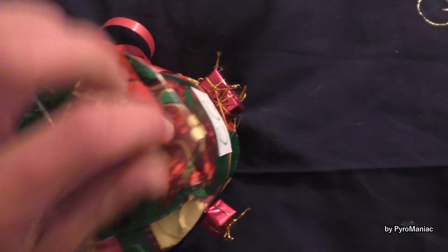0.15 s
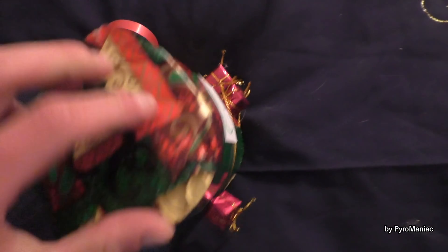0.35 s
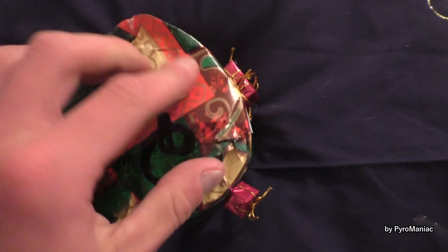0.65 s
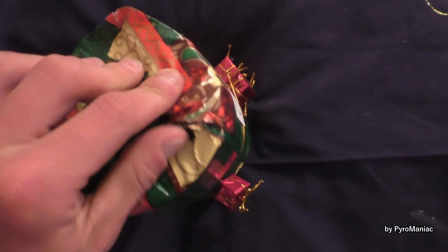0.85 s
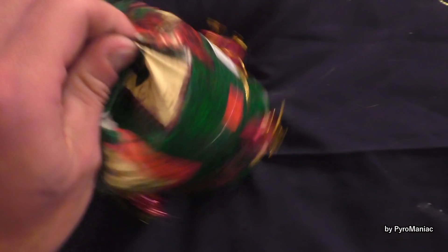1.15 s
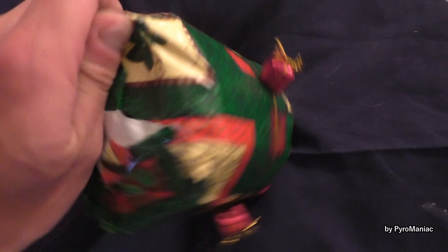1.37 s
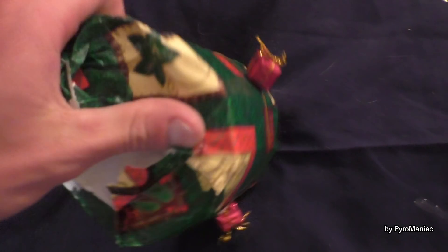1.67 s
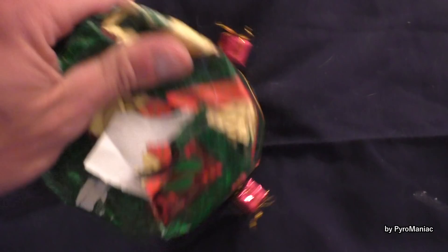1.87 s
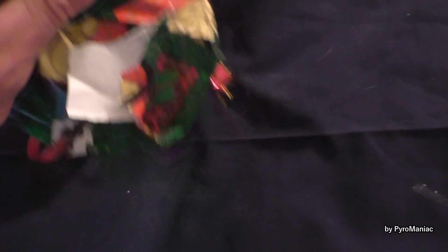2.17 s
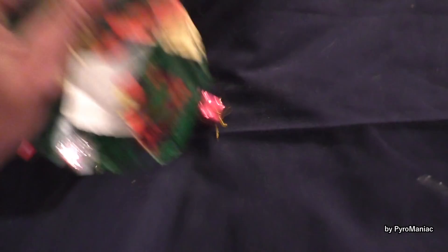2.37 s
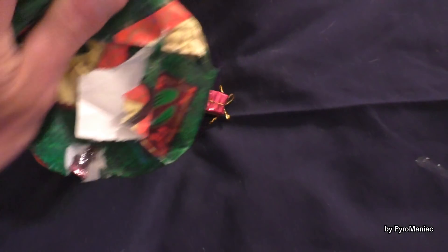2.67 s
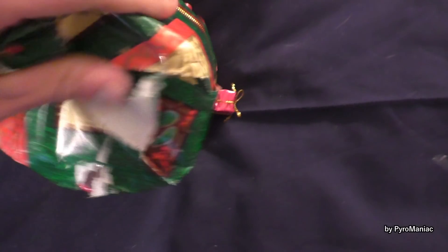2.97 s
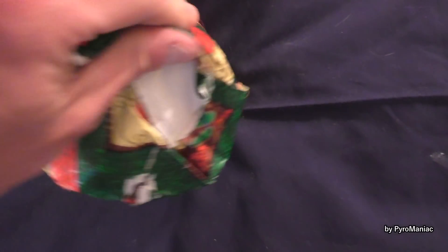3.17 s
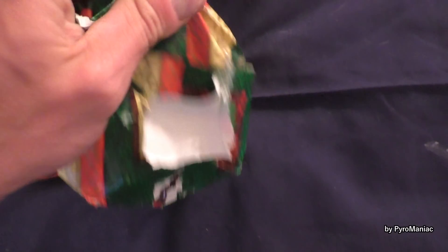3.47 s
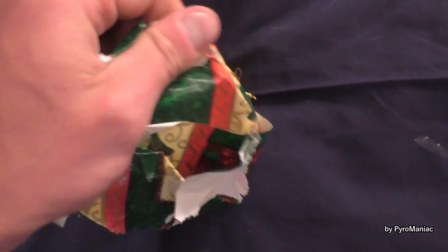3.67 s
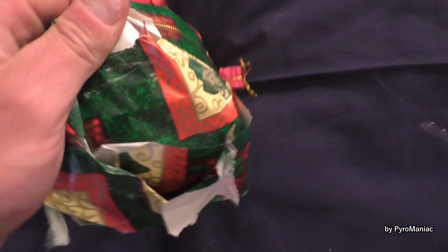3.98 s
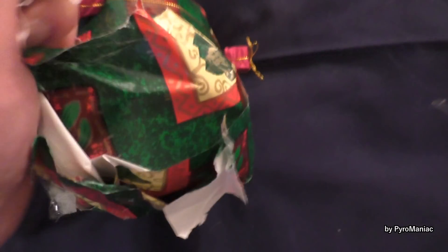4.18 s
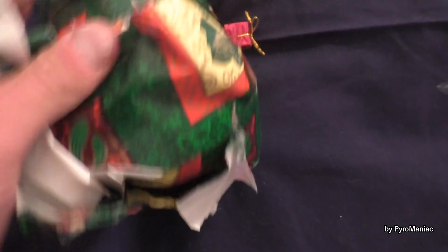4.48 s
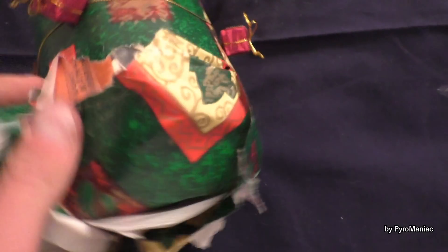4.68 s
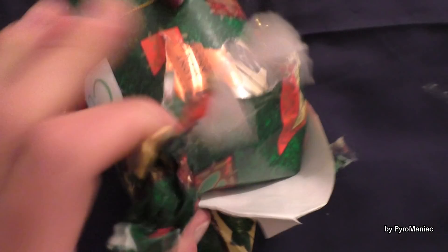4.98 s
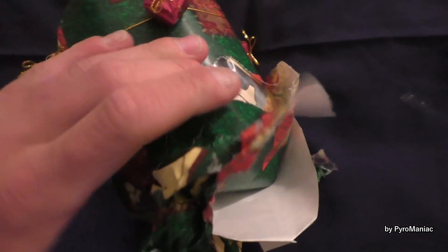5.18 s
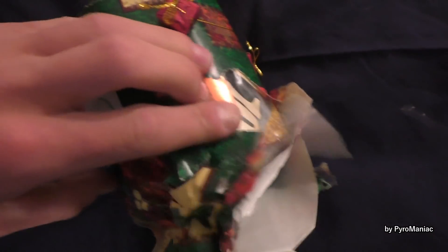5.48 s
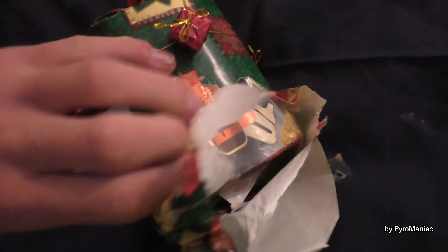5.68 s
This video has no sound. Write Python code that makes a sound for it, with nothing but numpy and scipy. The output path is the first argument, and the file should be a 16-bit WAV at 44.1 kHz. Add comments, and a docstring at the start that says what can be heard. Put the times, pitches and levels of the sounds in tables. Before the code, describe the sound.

Continuous crinkling of wrapping paper: separate bright snaps, clustered tiny ticks and fibrous hiss, with many short tears. Activity comes in bursts, easing around two seconds and again near 4.6, strongest near three to four and at the end. The hollow parcel knocks faintly and rubs low on fabric. Close stereo pickup indoors, little echo, slight shifts between left and right.

```python
"""Hands tear and crumple glossy wrapping paper on a cloth-covered table, close to a small stereo microphone.
Creases buckle as sharp snaps: short noise bursts that ring the nearest paper panel.
Tearing fibres and sliding fingers add clumped ticks and hiss, with quick tears cut from the same noise.
The hollow parcel knocks in a few low cycles and rumbles softly on the cloth as filtered noise.
The damped room answers the paper with sparse, fading reflections."""
import sys
import numpy as np
from scipy import signal
from scipy.fft import rfft, irfft
from scipy.io import wavfile
from scipy.ndimage import uniform_filter1d

SR = 44100
rng = np.random.default_rng(int(sys.argv[2]) if len(sys.argv) > 2 else 0)


def master_out(mix):
    """Clip the mix to full scale and print it as 16-bit PCM to the path in sys.argv[1]."""
    frames = np.transpose(np.atleast_2d(mix))
    ceiling = np.clip(frames, -1, 1)
    pcm = np.round(ceiling * 32767).astype(np.int16)
    wavfile.write(sys.argv[1], SR, pcm)


N = 257544  # length in samples
SPLIT_HZ, EDGE_HZ = 5000, 15750  # where the treble begins, where the microphone's band ends
USUAL_DB = -38.5  # ordinary crackle level; brightness and rumble shift around it


def gain_of(db):
    """Turns decibels into a plain multiplier."""
    return 10 ** (np.asarray(db) / 20)


def evened(x):
    """Scales each row to an average (RMS) strength of 1."""
    return x / np.sqrt(np.mean(x ** 2, -1, keepdims=True) + 1e-20)


def peaked(x):
    """Scales each row so that its highest peak is 1."""
    return x / (abs(x).max(-1, keepdims=True) + 1e-20)


def read(points, hz):
    """Reads a table over pitch, with straight lines on a logarithmic pitch scale."""
    f, value = np.transpose(points)
    return np.interp(np.log(hz + 1), np.log(f + 1), value)


def over_time(points):
    """Reads a table over time, with straight lines, at every sample."""
    return np.interp(np.arange(N) / SR, *np.transpose(points))


def panned(pan_db):
    """Left and right gains for a sound that is pan_db louder on the left."""
    return gain_of([[pan_db / 2], [-pan_db / 2]])


def treble(x):
    """The part above SPLIT_HZ, without delay, so that x - treble(x) is the part below."""
    taps = signal.firwin(45, SPLIT_HZ, pass_zero=False, fs=SR)
    return signal.oaconvolve(x, taps[None], "same", axes=1)


def place(times, sounds, pan_db):
    """Adds each sound so that its peak falls on its time."""
    size = sounds.shape[1]
    out = np.zeros((2, N + 2 * size))  # spare room at both ends
    for s, sound, pan in zip(times, sounds, pan_db):
        start = round(s * SR) + size - abs(sound).argmax()
        out[:, start:start + size] += panned(pan) * sound
    return out[:, size:size + N]


def patchy(x, db, frames, bins, size):
    """Lets the colour drift in random patches over time and frequency, as different folds take over."""
    z = signal.stft(x, SR, nperseg=size)[2]
    field = uniform_filter1d(rng.standard_normal(z.shape[1:]), bins, 0)
    field = uniform_filter1d(field, frames, 1)
    return signal.istft(z * gain_of(db * field / field.std()), SR, nperseg=size)[1][:, :N]


def room(x, size=9000):
    """Sparse reflections of random sign, other ones for each side; bass and treble die at their own speeds."""
    taps = np.zeros((2, size))
    # one reflection at a random place in every 22 samples
    at = np.arange(150, size - 22, 22) + rng.integers(0, 22, (2, (size - 151) // 22))
    np.put_along_axis(taps, at, rng.choice([-1., 1.], at.shape), 1)
    t, top = np.arange(size) / SR, treble(taps)
    low_fade, top_fade = gain_of(-60 * t / 0.21), gain_of(-60 * t / 0.2)  # seconds to fall by 60 dB
    tail = (taps - top) * low_fade + top * top_fade
    return signal.oaconvolve(x, tail / np.linalg.norm(tail[0]), axes=1)[:, :N]


# how strong the rumble is at each pitch, relative: (f/Hz, level/dB per Hz)
RUMBLE_COLOUR = [(12, -42), (20, -15), (81, -3.5), (256, -1.5), (440, -0.5), (567, -12), (792, -14.5),
                 (900, -10), (1170, -15), (1980, -120)]
# how alike the rumble is on the left and right: (f/Hz, likeness 0-1)
RUMBLE_LIKENESS = [(30, 0.1), (130, 0.46), (290, 0.54), (640, 0.98), (1400, 0.25)]
# rubbing on the cloth while the paper is at its usual loudness: (t/s, level/dB)
RUBBING_LEVEL = [(0, -53), (1.1, -56.5), (1.45, -54), (2.05, -59), (3.06, -51.5), (3.7, -58.5),
                 (4.419, -54), (4.6, -57), (5.0, -48), (5.2, -52.5), (5.35, -45.5), (5.84, -54)]
RUB_PER_DB = 0.0436  # dB of extra rumble for each dB of louder paper


def rumble(paper):
    """The parcel and hands rub the cloth: lumpy low noise, less alike left and right in the bass."""
    hz = np.fft.rfftfreq(N, 1 / SR)
    a, b = rfft(rng.standard_normal((2, N)))
    same = np.clip(read(RUMBLE_LIKENESS, hz), 0, 1)
    right = same * a + np.sqrt(1 - same ** 2) * b
    both = irfft(gain_of(read(RUMBLE_COLOUR, hz)) * np.array([a, right]), N)
    lumpy = evened(patchy(both, db=3, frames=3, bins=7, size=1024))
    power = uniform_filter1d(uniform_filter1d(paper[0] ** 2, 900), 900)
    paper_db = 10 * np.log10(abs(power) + 1e-9)
    pressure_db = over_time(RUBBING_LEVEL) + RUB_PER_DB * (paper_db - USUAL_DB)
    return panned(3) * gain_of(pressure_db) * lumpy


# how far the sideways difference lies under the middle sound: (f/Hz, level/dB)
SIDE_UNDER_MIDDLE = [(300, -18), (700, -11), (1500, -30.5), (3000, -19.5), (5000, -12.5), (9000, -21.5),
                     (14000, -7)]


def capsules(x):
    """Scattering off moving hands reaches the two capsules unequally by pitch, and keeps changing."""
    hz, t, z = signal.stft(x.mean(0), SR, nperseg=64)
    a, b = uniform_filter1d(rng.standard_normal((2, len(hz), len(t))), 120, axis=2)
    scatter = (a + 1j * b) / np.sqrt(np.mean(a ** 2 + b ** 2))
    amount = gain_of(read(SIDE_UNDER_MIDDLE, hz))[:, None]
    side = signal.istft(z * scatter * amount, SR, nperseg=64)[1][:N]
    return x + np.array([side, -side])


# knocks and pops of the hollow parcel: (start t/s, peak level/dB, f/Hz)
PARCEL_KNOCKS = [(.272, -40, 258), (0.637, -37, 270), (0.878, -32, 270), (1.371, -30, 650),
                 (1.419, -29, 444), (1.455, -27, 413), (1.957, -39, 305), (3.097, -46, 191),
                 (3.491, -48, 230), (3.8055, -25, 480), (3.8061, -16.5, 975), (4.36, -38, 182),
                 (4.427, -34, 433), (4.448, -27, 770), (4.943, -41, 200), (5.028, -35.5, 430),
                 (5.277, -41, 196), (5.358, -52, 264), (5.768, -41, 136)]


def thumps():
    """A soft push on the hollow parcel: two or three low cycles."""
    s, db, hz = np.transpose(PARCEL_KNOCKS)
    cycles = hz[:, None] * np.arange(1500) / SR
    sounds = peaked(cycles * np.exp(-cycles / 0.59) * np.sin(2 * np.pi * cycles))
    peak_at = s + np.argmax(abs(sounds), 1) / SR  # place() wants the peak, the table gives the start
    return place(peak_at, gain_of(db)[:, None] * sounds, 0.87 + 0 * s)


# paper, table reflection and microphone together: (f/Hz, level/dB)
PAPER_COLOUR = [(18, -11), (30, -47), (404, -0.5), (801, -7), (1220, 1.5), (2060, 4), (3140, 3.5),
                (4910, 1), (6050, 0.5), (7470, -7), (8740, -2), (11100, -2), (14400, -9.5), (16000, -5)]


def coloured(x, size=4096):
    """Filter that never sounds early: its phase follows from the Hilbert transform of the log gain."""
    log_gain = np.log(gain_of(read(PAPER_COLOUR, abs(np.fft.fftfreq(size, 1 / SR)))))
    taps = np.fft.ifft(np.exp(np.conj(signal.hilbert(log_gain)))).real[:size // 2]
    return signal.oaconvolve(x, taps[None], axes=1)[:, :x.shape[1]]


# how hard the hands work the paper, as loudness of the fine crackle: (t/s, level/dB)
HAND_WORK = [(0, -37), (.15, -52.5), (.28, -49.5), (.36, -48.5), (.6, -52), (.65, -42.5), (.78, -45.5),
             (1.25, -35.5), (1.34, -42), (1.63, -42), (1.72, -51), (1.78, -36), (1.98, -48), (2.03, -50.5),
             (2.15, -57.5), (2.31, -44), (2.56, -44), (2.64, -46), (2.8, -42.5), (2.9, -40), (3.06, -37),
             (3.42, -43), (3.55, -32.5), (3.74, -47.5), (3.81, -37), (3.96, -40), (4.0, -52), (4.06, -28),
             (4.15, -38.5), (4.31, -34), (4.47, -47), (4.62, -49.5), (4.8, -41.5), (4.86, -48), (5.15, -43),
             (5.23, -53), (5.35, -41.5), (5.58, -45.5), (5.84, -33)]


def hands():
    """The work of the hands in dB at every sample."""
    return over_time(HAND_WORK)


def buckles(hz, turns, crack_ms, size=800, lead=200):
    """Panel ring and crack of each crease: a burst of noise rises quickly, dies away and rings a damped panel."""
    t = (np.arange(size) - lead) / SR
    rise = .25 * np.exp(t / 0.00044) + 0.042 * np.exp(t / 0.0015)
    fall = np.exp(-t * 1000 / crack_ms) + 0.027 * np.exp(-t / 0.016)
    burst = rng.standard_normal((len(hz), size)) * np.where(t < 0, rise, fall)
    burst = signal.lfilter(*signal.butter(1, 600, "high", fs=SR), burst)  # small panels radiate little bass
    after = np.arange(size) / SR
    turns = turns * np.exp(.5 * rng.standard_normal((len(hz), 1)))  # taut panels ring on, crushed ones are dead
    ring = np.exp(-after * hz[:, None] / turns) * np.cos(2 * np.pi * hz[:, None] * after)
    top = treble(burst)
    rung = peaked(signal.fftconvolve(burst, ring, axes=1)[:, :size])
    rung = rung + 0.63 * peaked(burst - top)
    return peaked(coloured(rung - treble(rung))), peaked(coloured(top))


def small_ticks(clumps, count=40):
    """Many small creases: random picks from a set of buckling sounds, most frequent within the clumps."""
    ring, crack = buckles(np.geomspace(1100, 4800, count), turns=1.0, crack_ms=0.39)
    crack_db = -3 + 5.7 * rng.standard_normal((count, 1))  # some dull, some all crack
    grains = peaked(ring + gain_of(crack_db) * crack)
    happens = rng.random(N) < 1200 * clumps / SR  # about 1200 ticks a second
    size = gain_of(5.4 * np.minimum(rng.exponential(1, N), 3.5)) * happens
    which, pan_db = rng.integers(0, count, N), 0.93 * rng.standard_normal(count)
    ticks = np.zeros((2, N))
    for k in range(count):
        ticks += panned(pan_db[k]) * signal.oaconvolve(size * (which == k), grains[k])[:N]
    return evened(ticks)


def ticks_and_hiss():
    """Small creases, and the hiss of fibres that part too fast to tell apart, in the same clumps."""
    drift = uniform_filter1d(uniform_filter1d(rng.standard_normal(N), 200), 200)
    clumps = gain_of(3.7 * evened(drift))
    clumps /= clumps.mean()
    noise = coloured(rng.standard_normal((1, N)))
    hiss = evened(patchy(noise, db=3.5, frames=12, bins=8, size=256)) * clumps ** 0.57
    return small_ticks(clumps), hiss


# share of sliding hiss against separate ticks: (t/s, share 0-1)
HISS_SHARE = [(0, 0.28), (1.0, 0.36), (1.25, 0.65), (2.3, 0.08), (2.8, 0.09), (3.55, .5), (3.75, 0.33),
              (4.1, .5), (4.45, 0.28), (4.62, 0.7), (5.0, 0.52), (5.84, 0.62)]
USUAL_BRIGHT_DB, BRIGHTER_PER_DB = -2.5, 0.14  # treble against the rest; harder work is brighter


def crackle(ticks, hiss):
    """Fine crackle: ticks and hiss blended, as loud and as bright as the hands work."""
    smooth = np.clip(over_time(HISS_SHARE), 0, 1)
    paper = np.sqrt(1 - smooth) * ticks + np.sqrt(smooth) * hiss
    top = treble(paper)
    bright_db = USUAL_BRIGHT_DB + BRIGHTER_PER_DB * (hands() - USUAL_DB)
    return gain_of(hands()) * (evened(paper - top) + gain_of(bright_db) * evened(top))


# quick tears: (start t/s, length t/s, level/dB, flap f/Hz, brightness level/dB, place of the peak 0-1)
QUICK_TEARS = [(0.202, 0.019, -37, 1820, -9, 0.58), (.627, 0.036, -33, 2500, 0, 0.37),
               (0.93, 0.033, -32, 2000, 3, 0.43), (1.072, .045, -33.5, 2800, 4, 0.36),
               (1.171, 0.1, -31.5, 2950, 8.5, 0.58), (1.366, 0.072, -27, 2800, 4.5, 0),
               (1.439, 0.038, -35, 2000, 6.5, 0.48), (1.765, 0.053, -43, 3000, -1, 0.85),
               (1.825, 0.059, -34.5, 2600, -5, 0.56), (1.931, 0.07, -30, 2200, 3.5, 0.33),
               (2.524, 0.087, -41, 2110, 8.5, 0.49), (2.946, 0.073, -35, 1890, -10, 0.5),
               (3.087, 0.026, -25, 1800, 5, 0.69), (3.481, 0.083, -38, 2210, 10, 0.52),
               (3.935, 0.04, -28.5, 2600, 6.5, 0.46), (4.038, 0.077, -35.5, 1970, 10, 0.42),
               (4.262, 0.025, -39, 1890, 9.5, 0.45), (4.508, 0.041, -49, 1765, 8, .4),
               (4.764, .077, -42, 4460, 12, 0.55), (4.88, 0.14, -44.5, 3230, -11, 0.2),
               (5.002, 0.038, -29, 2380, -0.5, 0.55), (5.059, 0.13, -43, 3020, 0, 0.67),
               (5.274, 0.037, -39, 2200, -3.5, 0.36), (5.445, 0.064, -42, 3000, 5.5, 0.2),
               (5.707, 0.024, -39.5, 2500, 10.5, 0.7), (5.762, 0.048, -38, 3030, 6, .55)]


def rips(ticks, hiss):
    """Each quick tear swells and stops as the strip comes free; the loosened flap rings broadly at its pitch."""
    tear = evened(hiss + 0.87 * ticks)  # dense fibre hiss with separate ticks nearly as strong
    out = np.zeros((2, N))
    for s, length, db, hz, bright_db, peak in QUICK_TEARS:
        start, size = round(s * SR), round(length * SR)
        fibres = tear[:, start:start + size]
        top = treble(fibres)
        flap = signal.lfilter(*signal.iirpeak(hz, 2.2, SR), fibres)
        # bend time so that the middle of the sine arch falls on the peak
        bend = np.log(.5) / np.log(np.clip(peak, .02, .9))
        swell = np.sin(np.pi * (np.arange(size) / size) ** bend) ** 1.27
        sound = fibres - top + 0.37 * flap + gain_of(bright_db) * top
        out[:, start:start + size] += gain_of(db) * swell * sound
    return out


# the clearest creases: (peak t/s, panel ring level/dB, panel f/Hz, level/dB of the crack above 5 kHz)
CLEAR_CREASES = [(.006, -10.5, 2700, -19.5), (0.015, -34, 2500, -16.5), (0.035, -14.5, 2420, -13),
                 (.038, -13.5, 1640, -14.5), (0.0729, -19, 1790, -40), (0.0865, -15.5, 1670, -28),
                 (0.1606, -24.5, 1630, -19), (0.2208, -23, 1380, -50), (0.2459, -8.5, 1670, -8.5),
                 (0.2761, -14.5, 3400, -9), (0.2888, -19.5, 1740, -29), (0.2981, -13.5, 1610, -12),
                 (0.3167, -19, 1690, -13.5), (0.3773, -22, 1390, -49), (0.4198, -11.5, 3600, -20),
                 (.432, -15, 2150, -21), (0.4506, -22, 1660, -30), (0.4556, -16, 1320, -14),
                 (0.4709, -20, 2520, -10), (0.4975, -27, 2890, -45), (.5038, -21, 1700, -26),
                 (0.509, -20.5, 3150, -21), (.5365, -20, 2190, -11), (.539, -17.5, 1970, -10),
                 (.642, -17.5, 3040, -21), (.67, -15, 2000, -11.5), (0.6862, -18.5, 1640, -20),
                 (0.6937, -20, 1850, -19), (.7038, -12.5, 2320, -6.5), (.7175, -20, 2860, -35),
                 (.741, -10.5, 3380, -15), (.7552, -16.5, 3440, -6.5), (.7642, -18, 3540, -21),
                 (.8033, -19.5, 2330, -32), (0.8256, -15, 2230, -19.5), (0.8348, -17.5, 3320, -30),
                 (0.8505, -20, 3040, -15), (.8636, -29, 3470, -8), (0.8806, -8, 1420, -8),
                 (.888, -14, 4300, -7), (.9008, -11.5, 2270, -14), (0.9136, -21, 3320, -14),
                 (0.9247, -19, 5000, -2.5), (.976, -21, 3750, -14), (1.0069, -9, 1770, -18),
                 (1.0356, -14, 2630, -7.5), (1.0831, -14, 1940, -5.5), (1.1005, -11.5, 3030, -10),
                 (1.1087, -10, 2510, -9), (1.1217, -26, 4430, -10), (1.1362, -20, 2170, -14),
                 (1.1438, -15, 2150, -9), (1.189, -29, 2130, -22), (1.2016, -23, 2510, -8.5),
                 (1.2345, -14.5, 3000, -9), (1.3244, -14, 2670, -14), (1.369, -13.5, 1710, -3.5),
                 (1.384, -17, 2860, -15.5), (1.404, -23, 2800, -16), (1.4417, -11.5, 4270, -12.5),
                 (1.4461, -21, 2630, -12), (1.455, -25, 1250, -18), (1.4648, -13.5, 1410, -24),
                 (1.4762, -10.5, 4800, -15), (1.5345, -19, 1660, -24.5), (1.583, -18, 1060, -45),
                 (1.6545, -15.5, 2320, -41), (1.6689, -18.5, 2580, -10.5), (1.727, -23, 3030, -24),
                 (1.768, -11.5, 3500, -11.5), (1.7942, -20, 1390, -6.5), (1.8322, -23, 2930, -6),
                 (1.86, -10, 3100, -13), (1.8849, -8, 3200, -13), (1.9357, -17, 4500, -17),
                 (1.957, -10, 2240, -6), (2.0232, -25, 1240, -38), (2.0442, -31, 2280, -31),
                 (2.06, -28, 2310, -32), (2.089, -29, 2270, -31), (2.1754, -20.5, 2920, -38),
                 (2.184, -20, 2260, -19.5), (2.2255, -16.5, 3100, -4.5), (2.256, -27, 4070, -8.5),
                 (2.2812, -19, 1620, -20), (2.303, -23, 1760, -22), (2.316, -25, 4950, -19),
                 (2.332, -23, 1370, -14.5), (2.3563, -20.5, 3470, -15.5), (2.3773, -16, 1830, -21.5),
                 (2.3914, -21, 1980, -29), (2.4417, -38, 1980, -15), (2.4519, -19.5, 2030, -42),
                 (2.4713, -24, 2100, -18), (2.601, -36, 1230, -21), (2.609, -29, 2800, -22),
                 (2.6271, -22, 1270, -40), (2.6345, -35, 1550, -20), (2.668, -22.5, 1820, -17.5),
                 (2.7178, -19, 3540, -33), (2.751, -19, 3750, -13), (2.7655, -24.5, 1980, -18),
                 (2.827, -16.5, 4200, -13.5), (2.925, -15, 2050, -0.5), (2.9308, -18.5, 1620, -11),
                 (2.9867, -17.5, 1800, -26), (2.9909, -13.5, 2760, -10), (3.011, -19, 2540, -6.5),
                 (3.025, -7, 2360, -14), (3.0595, -12.5, 1590, -13), (3.0688, -17, 2240, -5),
                 (3.0913, -21, 3210, -11), (3.103, -13, 1290, -14), (3.1066, -9, 1880, -23),
                 (3.139, -44, 4690, -17), (3.164, -39, 1810, -14), (3.188, -11, 2130, -9.5),
                 (3.212, -19, 2070, -15), (3.2337, -15.5, 2600, -11), (3.2583, -12.5, 3400, -12),
                 (3.2921, -17, 4160, -8), (3.3127, -19, 5100, -8), (3.3198, -14, 4300, -14),
                 (3.3776, -20, 1600, -38), (3.3828, -11, 1840, -19), (3.4561, -15, 4130, -12),
                 (3.4816, -21, 1440, -11), (3.4994, -10.5, 1870, -12), (3.519, -18, 2150, -11),
                 (3.5389, -11.5, 2230, -15), (3.619, -18, 2190, -13), (3.634, -22, 5000, -17),
                 (3.6526, -17, 1470, -13.5), (3.702, -17, 4070, -20), (3.7244, -25, 2300, -20),
                 (3.7533, -36, 3340, -22), (3.7776, -39, 1420, -17), (3.7924, -22, 2300, -16),
                 (3.8016, -24, 3160, -22), (3.8065, -12.5, 1100, -8), (3.8174, -14, 1800, -4.5),
                 (3.839, -24, 3100, -23), (3.8663, -19, 2400, -35), (3.9193, -29, 3050, -11),
                 (3.948, -7.5, 3060, -1), (3.982, -8, 2560, -11.5), (4.0367, -10.5, 1900, -11),
                 (4.051, -25, 2280, -2.5), (4.0955, -14, 2070, -14), (4.1215, -12, 2980, -8),
                 (4.1763, -38, 1790, -21), (4.19, -35, 3840, -11.5), (4.1976, -15, 1210, -9),
                 (4.2706, -26, 3050, -25), (4.2928, -11, 1950, -13.5), (4.3152, -14, 1580, -11),
                 (4.329, -24, 1650, -14), (4.3635, -13, 3230, -13), (4.416, -14.5, 2980, -36),
                 (4.4303, -13.5, 1560, -6.5), (4.435, -12, 1800, -20), (4.4505, -12, 1310, -16),
                 (4.4763, -25, 1850, -23), (4.7688, -19.5, 3700, -19), (4.8045, -43, 1720, -13),
                 (4.8403, -22.5, 1580, -21), (4.917, -23.5, 3300, -37), (4.958, -19.5, 2400, -22),
                 (5.0047, -23, 3120, -23), (5.03, -38, 1550, -9), (5.0465, -20, 2270, -22),
                 (5.0969, -13, 3650, -23), (5.201, -24.5, 1500, -19.5), (5.2943, -36, 3320, -23),
                 (5.3144, -19, 2260, -34), (5.363, -12.5, 1880, -22), (5.3687, -12.5, 3160, -15.5),
                 (5.384, -18, 1490, -32), (5.4007, -24.5, 2860, -28), (5.4547, -20, 4030, -19),
                 (5.5744, -20, 1910, -45), (5.6149, -23, 2030, -18), (5.645, -8.5, 2950, -4.5),
                 (5.6695, -17, 3540, -11.5), (5.7784, -8.5, 3540, -0.5), (5.8058, -36, 1510, -13),
                 (5.8124, -24, 3280, -13), (5.8288, -7, 3230, -11), (5.8371, -8, 4390, -15)]
SMALL_PER_S = 30  # small creases a second
SMALL_OVER_DB, SMALL_SPREAD_DB = 10, 2  # how far they stand over the crackle, and how much that varies
SMALL_CRACK_DB = 5.5  # their crack over their ring, on average


def creases():
    """The listed creases, then small ones at random moments, as strong as the hands work just then."""
    when, where = rng.random((round(SMALL_PER_S * N / SR), 2)).T
    strength, colour = rng.standard_normal((len(when), 2)).T
    db = hands()[(when * N).astype(int)] + SMALL_OVER_DB + SMALL_SPREAD_DB * strength
    ring_db, crack_db = db - 4 * colour, db + SMALL_CRACK_DB + 4 * colour
    small = np.array([when * N / SR, ring_db, 1300 * 3.9 ** where, crack_db])
    return np.hstack([np.transpose(CLEAR_CREASES), small])


def snaps():
    """Each crease, somewhere on the parcel; the hollow parcel answers with a faint low puff."""
    s, db, hz, crack_db = creases()
    ring, crack = buckles(hz, turns=0.86, crack_ms=0.25)
    puff_hz = 330 * np.exp(0.4 * rng.standard_normal((len(s), 1)))
    cycles = puff_hz * np.arange(ring.shape[1]) / SR
    puff = peaked(cycles * np.exp(-cycles / 0.4) * np.sin(2 * np.pi * cycles))
    sounds = gain_of(db)[:, None] * (ring + gain_of(-29) * puff)
    sounds = sounds + gain_of(crack_db)[:, None] * crack
    return place(s, sounds, 1.4 * rng.standard_normal(len(s)))


def scene():
    """The paper as the two capsules hear it, its room echo, and the rumble on the cloth."""
    ticks, hiss = ticks_and_hiss()
    paper = thumps() + crackle(ticks, hiss) + rips(ticks, hiss) + snaps()
    return gain_of(-19) * room(paper) + rumble(paper) + capsules(paper)


def record(dry):
    """The left capsule is a little brighter than the right; then everything above EDGE_HZ is cut."""
    mic = dry + np.array([[.08], [-.08]]) * treble(dry)
    taps = signal.firwin(511, EDGE_HZ, window=("kaiser", 9), fs=SR)
    return signal.oaconvolve(mic, taps[None], "same")


dry = scene()
out = record(dry)
master_out(out)
```